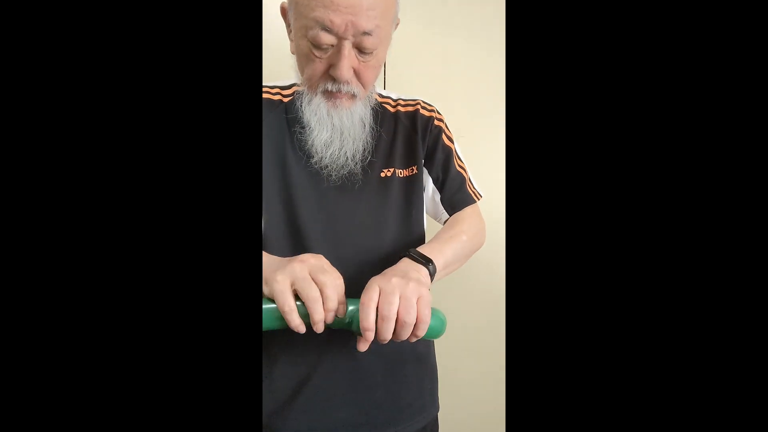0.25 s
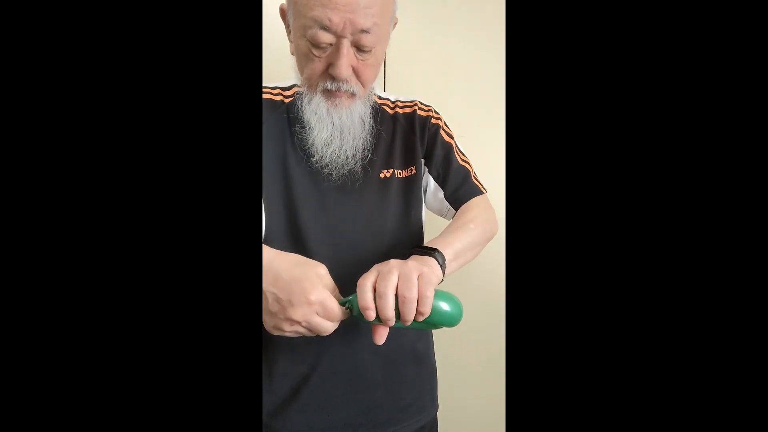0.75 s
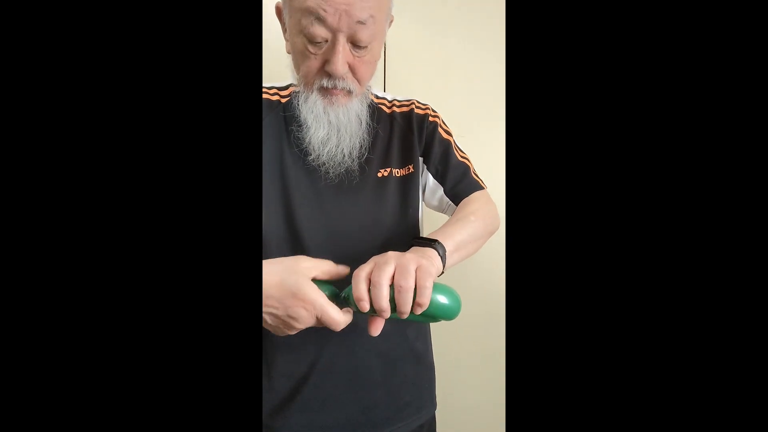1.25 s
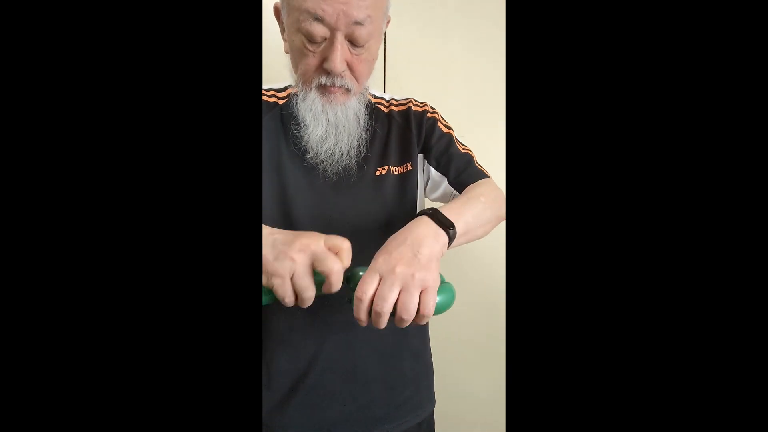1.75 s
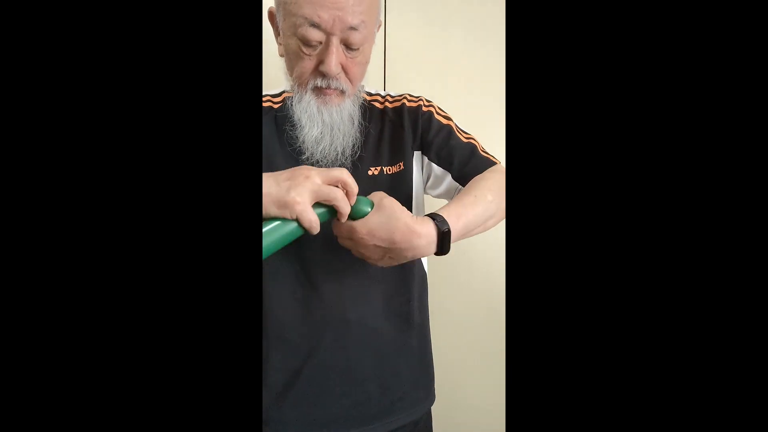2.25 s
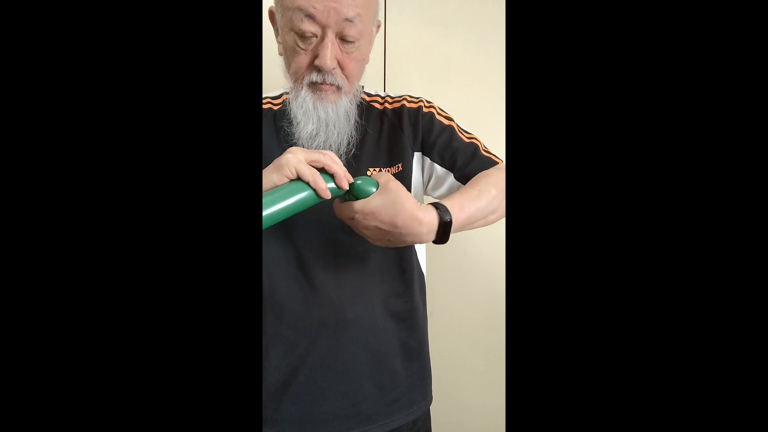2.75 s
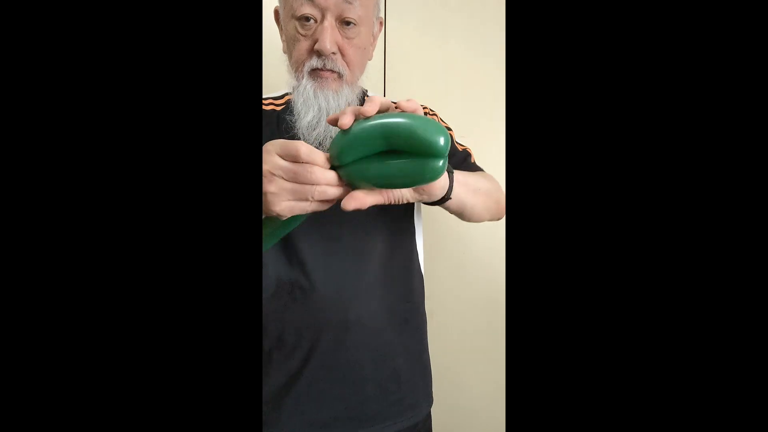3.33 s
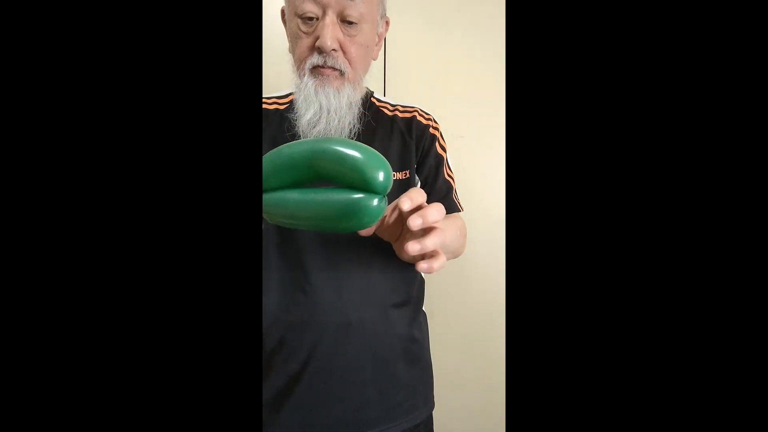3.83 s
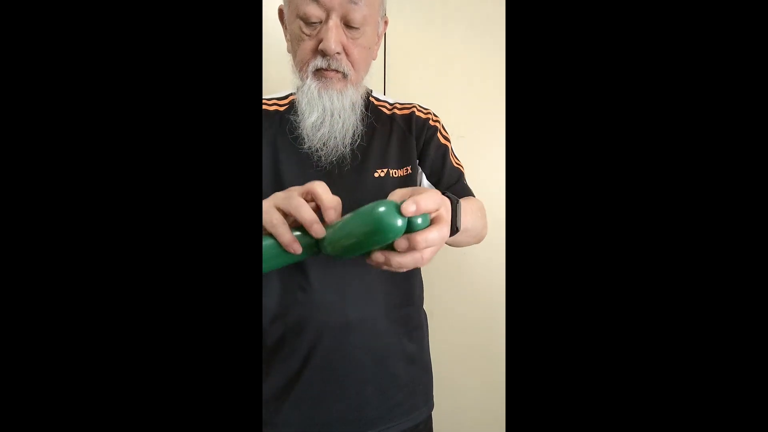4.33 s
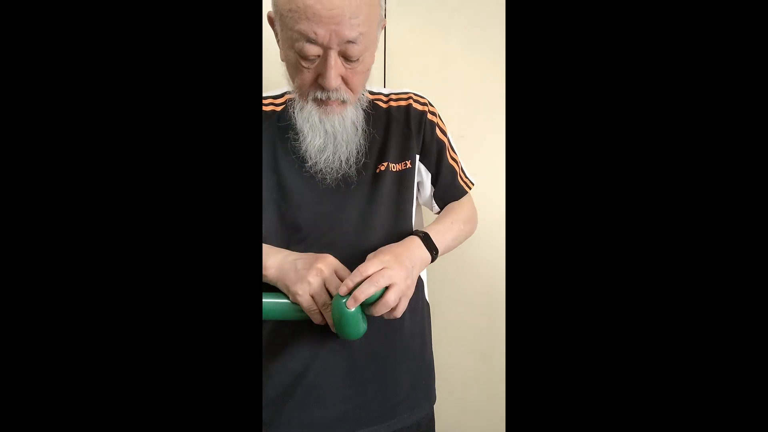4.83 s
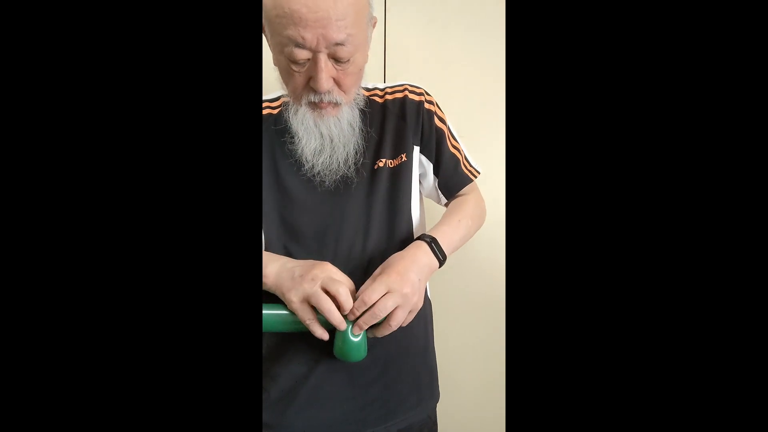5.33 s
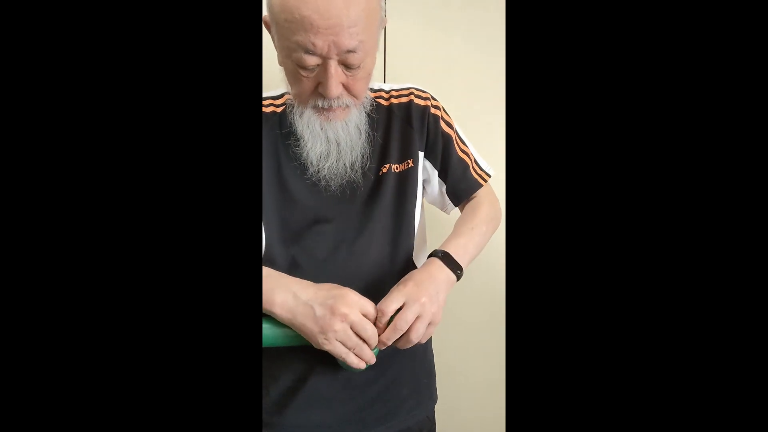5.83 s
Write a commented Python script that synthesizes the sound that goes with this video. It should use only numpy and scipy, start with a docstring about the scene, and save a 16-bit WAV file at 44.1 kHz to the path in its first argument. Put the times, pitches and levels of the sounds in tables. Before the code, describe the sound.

Hands twist and fold a long latex balloon: gritty stick-slip creaks, short squeaks and sharp overloading lurches, with a brief near-quiet pause midway.

```python
"""Long balloon, twisted and folded

Two hands twist and fold a long latex balloon close to a microphone in a small room.
The rubber sticks and slips: trains of tiny slips creak through the taut skin and the air inside.
Single snaps are larger slips, lurches are dense runs that overload the microphone,
and soft bumps set decaying modes of the whole tube swinging. A machine hums low behind, under room air.
"""
import sys
import numpy as np
from scipy import signal
from scipy.fft import rfft, irfft
from scipy.io import wavfile
from scipy.ndimage import uniform_filter1d

SR = 44100
rng = np.random.default_rng(int(sys.argv[2]) if len(sys.argv) > 2 else 0)


def generate_wav(sig):
    """Save sig (samples, or channels by samples) to the path in sys.argv[1] as 16-bit PCM at SR."""
    pcm = np.round(np.clip(np.atleast_2d(sig).T, -1, 1) * 32767).astype(np.int16)
    wavfile.write(sys.argv[1], SR, pcm)


N = 267246
TIME = np.arange(N) / SR

# level of the hum: start_s, level_db
HUM_SWELL = [(0, -36), (3.3, -37), (3.55, -35), (3.8, -27), (4.2, -25), (4.6, -29), (6.06, -27)]
# lines of the hum, relative to its level: pitch_hz, level_db
HUM_LINES = [(37.8, 2.5), (100.5, -14.5)]
# colour of the room air: frequency_hz, relative level_db per Hz
AIR_COLOUR = [(30, -3), (100, -2.5), (200, -7.5), (700, -6), (1100, -11.5), (2000, -19), (4000, -30),
              (15000, -48)]
AIR_DB = -39.5  # air level where the hum is loudest

# creak of rubber held under tension: start_s, effort_db, sizzle_db (relative), pitch_hz
STRAIN_CURVE = [(0, -38, -2.5, 600), (0.451, -37, 0.5, 1050), (0.729, -30.5, -8.5, 1280),
                (1.301, -31, -14, 1300), (1.408, -42, 3.5, 700), (1.82, -41, -0.5, 800),
                (2.05, -34, 0.5, 950), (2.22, -52, 5.5, 610), (2.53, -33, 7.5, 1200),
                (2.689, -42, -9, 1200), (3.12, -20.5, -4.5, 1060), (3.46, -21, -0.5, 1020),
                (3.572, -32, 7, 600), (3.731, -37, 3, 400), (3.86, -70, -5, 400), (4.16, -60, 0, 400),
                (4.36, -15, -8.5, 2000), (4.98, -19, -6, 2400), (5.251, -12, -13, 1572),
                (5.439, -19, -6, 1500), (5.75, -14.5, -10, 1900), (6.06, -15, -7, 1700)]
# the twist gives way all at once: start_s, effort_db, pitch_hz, ring share (0-1), sizzle_db (relative)
LURCH_EVENTS = [(0, -16.5, 720, 0.23, -15), (0.068, -23.5, 1160, 0, 0.5), (1.164, -7, 1280, 0.01, -3),
                (1.245, -2.5, 1865, 0.01, -5), (1.512, -33, 427, .5, 3.5), (1.929, -21, 830, 0.19, 0),
                (2.225, -27.5, 504, 0.32, -2), (2.585, -12.5, 1184, 0, -23), (3.312, -11.5, 1130, 0.7, 4),
                (3.427, 0.5, 1070, 0.32, -14), (4.318, -2, 1568, 0, -9), (4.642, 4.5, 2230, 0.3, -12),
                (5.462, 2.5, 1062, 0.61, -14), (5.879, -1, 2040, 0, -7.5)]
# single large slips: start_s, level_db (before a shared gain), pitch_hz, sizzle_db (relative to the ring)
SNAP_EVENTS = [(.070, -13.5, 1270, 1), (0.112, -13.5, 1200, 1), (0.177, -13, 520, -9),
               (.266, -19.5, 885, 5), (1.86, -22.5, 1260, -3), (1.933, -13.5, 1090, 6),
               (2.226, -16, 600, -1), (2.576, -1, 1270, -24), (2.585, -2, 1310, -21),
               (2.59, -12, 1230, -15), (2.626, -13, 1150, 13.5), (2.903, -7.5, 1040, -3),
               (3.699, -20, 955, 9), (4.046, -26.5, 1640, 21.5), (4.093, -21, 1680, 16.5),
               (4.135, -31, 1520, 26), (4.169, -16, 1500, 8), (4.613, 10, 2096, 1), (4.753, 1, 709, 3),
               (5.008, -2, 2480, 0)]
# a pinched patch of skin sings out: start_s, length_s, effort_db, pitch_hz
SQUEAK_EVENTS = [(0.266, 0.22, -30, 1016), (1.5, .13, -28.5, 2250), (1.629, 0.14, -32, 1030),
                 (2.094, 0.059, -20.5, 920), (2.823, 0.071, -24, 624), (2.979, .07, -9.5, 1600),
                 (3.04, .06, -13, 1137), (3.435, .04, -7, 460), (4.244, .07, -17, 352),
                 (4.678, 0.035, -6, 767), (5.535, 0.072, -15, 1300)]
# turns of the hand, each a creak that swells and ebbs:
# start_s, length_s, effort_db, pitch_hz, sizzle_db (relative)
STROKE_EVENTS = [(0.517, 0.18, -21, 1330, 0), (1.011, 0.17, -20, 2140, -1), (1.884, 0.1, -27.5, 839, 0.5),
                 (2.415, 0.093, -17.5, 1388, -6), (2.701, 0.12, -18.5, 1370, -3),
                 (2.886, .15, -14, 1084, -4), (3.118, 0.15, -17, 1100, 2.5),
                 (3.307, 0.12, -11.5, 1103, 0.5), (3.689, 0.037, -24.5, 415, 1),
                 (4.191, 0.12, -13, 2063, 2), (4.489, 0.076, 0.5, 2030, -11.5),
                 (4.747, 0.075, -8.5, 1990, -13), (4.827, .1, -9, 2200, -7), (5.021, 0.088, -8, 2572, -6),
                 (5.135, 0.084, -5.5, 1390, -12), (5.329, 0.098, -8, 1170, -14),
                 (5.571, 0.15, -7, 2554, -6.5), (5.891, 0.12, -3, 1282, -14.5)]
# bumps of the whole tube: start_s, level_db, hardness as tilt (dB per octave)
BUMP_EVENTS = [(3.444, -3.5, 4), (4.176, -1.5, -9), (4.274, -10, -1)]

# colour of a slip in the skin: frequency_hz, relative level_db
SKIN_COLOUR = [(200, -42.5), (500, -3), (800, 0), (1100, 4.5), (1600, 3), (2300, 4.5), (3200, -1.5),
               (4800, -9), (6500, -12.5), (12000, -73.5)]
# colour of a slip in the whole tube: frequency_hz, relative level_db
BOOM_COLOUR = [(50, -19.5), (130, -11.5), (250, -14), (380, -1), (600, 10.5), (850, -4.5), (1600, -38)]
# colour of a slip at the rubbing contact: frequency_hz, relative level_db
SIZZLE_COLOUR = [(1500, -10), (3500, 2.5), (5000, 4), (6000, -2.5), (7000, 3.5), (8000, -4), (9500, 2.5),
                 (12000, -2), (13000, -6.5), (15500, -3.5)]
# how strongly slips shake the whole tube, more once folded and gripped: start_s, level_db (re effort)
BOOM_SWELL = [(0, -23.5), (3.35, -11), (3.44, -8), (4.25, -13.5), (4.55, -8.5), (5.25, -10), (5.5, -10.5)]
# modes of the whole tube: pitch_hz, level_db (before hardness tilt), fade_s (time to 1/e)
TUBE_RESONANCES = [(142, -8.5, 0.0064), (200, -1, 0.0067), (335, -3, .016)]

# room decay: frequency_hz, t60_s (before the early and tail envelopes)
ROOM_DECAY = [(150, 0.24), (600, 0.31), (2000, 0.18), (6000, 0.25), (14000, 0.18)]
# colour difference between the microphone's two ports: frequency_hz, left minus right level_db
PORT_COLOUR = [(60, -2.5), (700, 0.5), (1300, -1.5), (2400, -1.5), (4400, 7), (8000, 1.5), (14000, 0.5)]

RISE_SHARE = .47  # the part of a swell spent pressing harder
BEND_OCTAVES = .15  # the ring climbs this far from a slack to a full press
LURCH_ATTACK_S, LURCH_FADE_S, LURCH_SHAPE = .001, .036, 1.25
PATHS_PER_S = 4  # how often the turning balloon offers the ports a new path
EDGE_HZ = 15750  # upper band limit


def amp(db):
    """Decibels to linear gain."""
    return 10 ** (np.asarray(db) / 20)


def evened(x):
    """Scale the whole sound to unit power."""
    return x / np.sqrt(np.mean(x ** 2) + 1e-20)


def steadied(x, size=1100):
    """Unit power from moment to moment, single slips left standing."""
    power = uniform_filter1d(uniform_filter1d(x ** 2, size), size)
    return x / np.sqrt(abs(power) + 1e-12)


def read(points, hz):
    """Read a table of values along a logarithmic frequency axis."""
    f, value = np.transpose(points)
    return np.interp(np.log(hz + 1), np.log(f + 1), value)


def add(mix, s, sound):
    """Lay a sound into the mix, starting at s seconds."""
    part = mix[max(round(s * SR), 0):][:len(sound)]
    part += sound[:len(part)]


def colour(x, spectrum, size=4096):
    """Causal, minimum-phase filter of unit energy with the given spectrum."""
    hz = abs(np.fft.fftfreq(size, 1 / SR))
    log_gain = np.log(amp(read(spectrum, hz)))
    kernel = np.fft.ifft(np.exp(np.conj(signal.hilbert(log_gain)))).real[:size // 2]
    return signal.oaconvolve(x, kernel / np.linalg.norm(kernel))[:len(x)]


def resonate(x, hz, width_hz):
    """A resonance of gain 1 that can follow a pitch curve."""
    turn = np.exp(2j * np.pi * np.cumsum(hz * np.ones(len(x))) / SR)
    r = np.exp(-np.pi * width_hz / SR)
    # shift the ring down to zero frequency, smooth it there, shift it back
    smooth = signal.lfilter([1 - r], [1, -r], x / turn + 1e-18)
    return 2 * (turn * smooth).real


def wander(n, per_s):
    """Straight lines between random points of unit spread, per_s points a second."""
    return np.interp(np.arange(n) * per_s / SR, np.arange(n), rng.standard_normal(n))


def background(waver_db=-1.1, air_follows=0.75):
    """A low machine hum of wavering sine lines that swells, and filtered-noise room air with it."""
    level_db = np.interp(TIME, *np.transpose(HUM_SWELL))
    lines = 0
    for hz, db in HUM_LINES:
        level = amp(db + waver_db * wander(N, 5.4))
        lines = lines + level * np.sin(2 * np.pi * hz * TIME + 0.24 * wander(N, 5.9))
    shared, left, right = (colour(noise, AIR_COLOUR) for noise in rng.standard_normal((3, N)))
    air = evened(shared + 0.52 * np.array([left, right]))
    air *= amp(AIR_DB + air_follows * (level_db - level_db.max()))
    return np.sqrt(2) * lines * amp(level_db) + air


def slips(rate, jitter=.45, spread_db=3.0, first=70):
    """Stick and slip: after a first full slip, strain builds unevenly and lets go in uneven clicks."""
    n = len(rate)
    built_up = np.cumsum(rate * np.exp(jitter * wander(n, 120))) / SR
    lets_go = np.diff(np.floor(built_up), prepend=0) > 0
    clicks = lets_go * amp(spread_db * np.clip(wander(n, 400), -2, 2))
    return clicks + signal.unit_impulse(n, first)


def peel(clicks, fade_s, grit, size=500):
    """Each slip tears loose in a click and a short spray of finer ones."""
    fade = np.exp(-np.arange(size) / SR / fade_s)
    spray = signal.oaconvolve(clicks, fade)[:len(clicks)]
    return clicks + grit * spray * rng.standard_normal(len(clicks))


def rub(start, press, effort_db, hz, share, sizzle_db, slips_per_s=400, hurry=.026,
        ring_damping=0.29, skin_db=-1):
    """Slips drive the skin, its pinched patch, the whole tube and the contact; harder rubbing slips faster."""
    t = start + np.arange(len(press)) / SR
    # slips_per_s holds before jitter, at 0 dB effort and full press
    clicks = slips(slips_per_s * np.exp(hurry * effort_db) * (1 + press) / 2)
    drive = peel(clicks, fade_s=0.0019, grit=0.13)

    # the pinched patch keeps changing size
    hz = hz * 2 ** (BEND_OCTAVES * (press - 1)) * np.exp(0.065 * wander(len(t), 58.6))
    width_hz = ring_damping * hz.mean()  # higher rings die sooner
    ring = steadied(resonate(resonate(drive, hz, width_hz), hz, width_hz))
    skin = steadied(colour(drive, SKIN_COLOUR))
    boom = steadied(colour(drive, BOOM_COLOUR))
    sizzle = steadied(colour(peel(clicks, fade_s=0.0023, grit=0.54), SIZZLE_COLOUR))

    sound = np.sqrt(share) * ring + np.sqrt(1 - share) * amp(skin_db) * skin
    sound += amp(np.interp(t, *np.transpose(BOOM_SWELL))) * boom
    sound += amp(sizzle_db) * sizzle
    return start, amp(effort_db) * press * sound


def strain(share=0.15, catch_db=2.5, catches_per_s=35):
    """The creak of rubber held under tension, which catches and frees unevenly."""
    s, *columns = np.transpose(STRAIN_CURVE)
    effort_db, sizzle_db, hz = (np.interp(TIME, s, c) for c in columns)
    effort_db = effort_db + catch_db * wander(N, catches_per_s)
    return rub(0, np.ones(N), effort_db, hz, share, sizzle_db)


def lurch(s, effort_db, hz, share, sizzle_db, size=8000):
    """A dense run of slips that starts at once and dies as the strain is spent."""
    t = np.arange(size) / SR
    press = np.minimum(t / LURCH_ATTACK_S, 1) * np.exp(-(t / LURCH_FADE_S) ** LURCH_SHAPE)
    return rub(s, press, effort_db, hz, share, sizzle_db)


def snap(s, db, hz, sizzle_db, ring_width_hz=600, skin_db=-5, gain_db=3, size=2000):
    """One large slip: a few cycles of the skin and a tick."""
    click = signal.unit_impulse(size)
    ring = resonate(resonate(click, hz, ring_width_hz), hz, ring_width_hz)
    skin = colour(click, SKIN_COLOUR)
    tick = colour(peel(click, fade_s=0.00047, grit=0.31), SIZZLE_COLOUR)
    ring, skin, tick = (x / abs(x).max() for x in (ring, skin, tick))
    return s, amp(db + gain_db) * (ring + amp(skin_db) * skin + amp(sizzle_db) * tick)


def squeak(s, length_s, effort_db, hz, share=0.65, sizzle_db=-7):
    """The swell of a stroke, with most of its force going into the pinched patch."""
    return stroke(s, length_s, effort_db, hz, sizzle_db, share)


def stroke(s, length_s, effort_db, hz, sizzle_db, share=0.12):
    """The hand presses harder up to a crest, then eases off, to 1/e at length_s."""
    t = np.arange(0, 2 * length_s, 1 / SR)
    swell_s = length_s * RISE_SHARE
    rise = np.minimum(t / swell_s, 1) ** .8
    ease = np.exp(-(np.maximum(t - swell_s, 0) / (length_s - swell_s)) ** 2)
    return rub(s, rise * ease, effort_db, hz, share, sizzle_db)


def bump(s, db, tilt_db, size=8000):
    """A soft blow swings the whole tube for a few cycles; a harder one favours the upper modes."""
    t = np.arange(size) / SR
    swing = np.zeros(size)
    for hz, mode_db, fade_s in TUBE_RESONANCES:
        octaves = np.log2(hz / TUBE_RESONANCES[1][0])  # from the second mode
        swing += amp(mode_db + tilt_db * octaves) * np.sin(2 * np.pi * hz * t) * np.exp(-t / fade_s)
    return s, amp(db) * swing * (1 - np.exp(-t / 0.0011))  # soft onset


def air_column(x, pitch_hz=159, reflection=0.39, dull_hz=2500):
    """Sound runs to and fro along the air inside the tube, duller each trip: returns the echoes alone."""
    hz = np.fft.rfftfreq(2 * N, 1 / SR)
    trip = reflection * np.exp(-2j * np.pi * hz / pitch_hz) / (1 + (hz / dull_hz) ** 2)
    return irfft(rfft(x, 2 * N) * trip / (1 - trip))[:N]  # all trips summed


def room(x, lag, direct_db=-5, early_db=-4.0, tail_db=-6, early_s=0.0043, shared_hz=500):
    """Direct sound (lag samples later at one port), quick echoes from hands and chest, then the tail."""
    t = np.arange(SR // 2) / SR
    taps = rng.choice([-1., 1.], (2, len(t))) * (rng.random((2, len(t))) < .15)
    hz, at, z = signal.stft(taps, SR, nperseg=256)
    same = (1 / (1 + (hz / shared_hz) ** 2))[:, None]  # bass is alike at both ports
    z[1] = same * z[0] + np.sqrt(1 - same ** 2) * z[1]
    decay = amp(-60 * at / read(ROOM_DECAY, hz)[:, None])
    echoes = signal.istft(z * decay, SR, nperseg=256)[1][:, :len(t)]

    early = echoes * np.exp(-t / early_s) * (t > .0005)
    tail = echoes * np.clip(t / 0.0065 - .5, 0, 1)  # builds up after the first echoes
    response = np.zeros((2, len(t)))
    for db, part in ((early_db, early), (tail_db, tail)):
        response += amp(db) * part / np.linalg.norm(part, axis=1, keepdims=True)
    response[[0, 1], [max(lag, 0), max(-lag, 0)]] += amp(direct_db)
    return signal.fftconvolve(x[None], response, axes=1)[:, :N]


def turning(x, count):
    """Hands a lasting sound on from one path to the next, in equal-power crossfades."""
    place = (TIME * PATHS_PER_S - np.arange(count)[:, None] + 1) % count
    return x * np.sqrt(np.maximum(1 - abs(place - 1), 0))


def scene(tube_db=-5, snap_direct_db=-3, count=13):
    """The balloon turns in the hands, so successive sounds take different paths; snaps share one."""
    paths = turning(strain()[1], count)
    snaps = np.zeros(N)
    sources = ((lurch, LURCH_EVENTS), (squeak, SQUEAK_EVENTS), (stroke, STROKE_EVENTS), (bump, BUMP_EVENTS))
    for source, table in sources:
        for k, row in enumerate(table):
            add(paths[k % count], *source(*row))
    for row in SNAP_EVENTS:
        add(snaps, *snap(*row))

    skin = sum(room(x, lag=k % 7 - 3) for k, x in enumerate(paths))
    skin += room(snaps, lag=1, direct_db=snap_direct_db, early_db=-8.0, tail_db=-4.0)
    tube = room(air_column(paths.sum(0) + snaps), lag=0)
    return skin + amp(tube_db) * tube + background()


def record(dry, ceiling=0.99):
    """The microphone: port colour, overload as hard clipping at the ceiling, then the band limit."""
    difference_db = read(PORT_COLOUR, np.fft.rfftfreq(N, 1 / SR))
    tilt = amp(np.array([[.5], [-.5]]) * difference_db)  # half to each port
    heard = np.clip(irfft(rfft(dry) * tilt, N), -ceiling, ceiling)
    low_pass = signal.firwin(511, EDGE_HZ, window=("kaiser", 8), fs=SR)
    return signal.oaconvolve(heard, low_pass[None], "same")


dry = scene()
out = record(dry)
generate_wav(out)
```